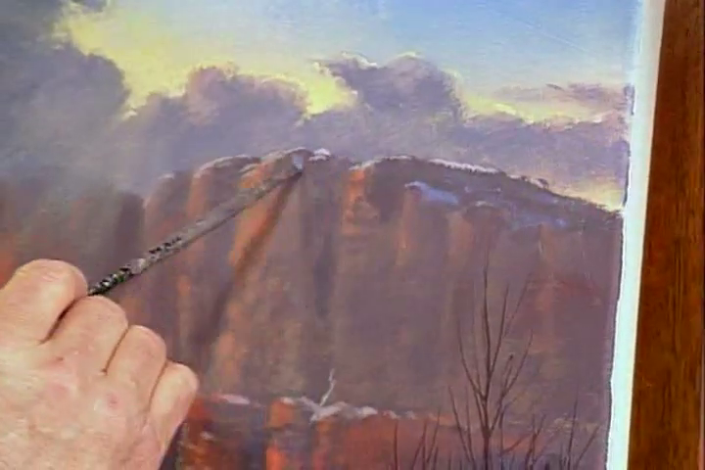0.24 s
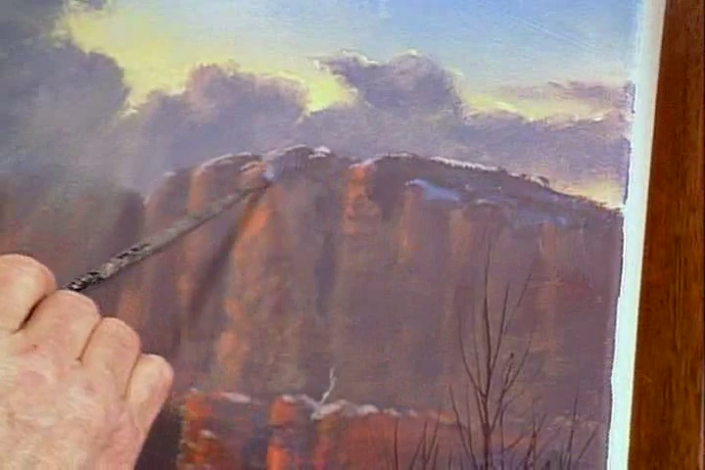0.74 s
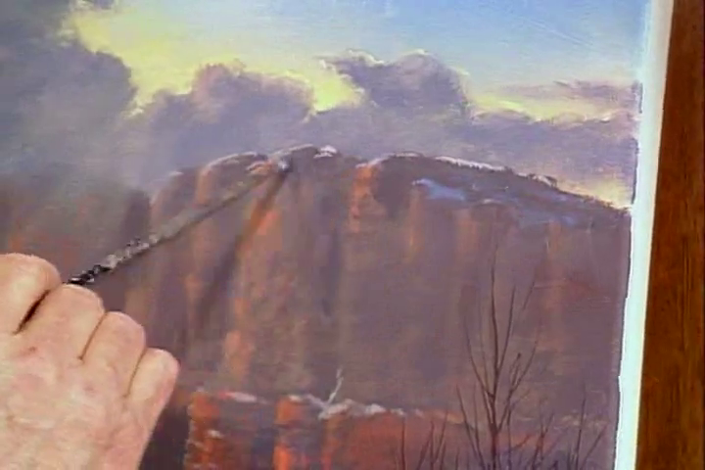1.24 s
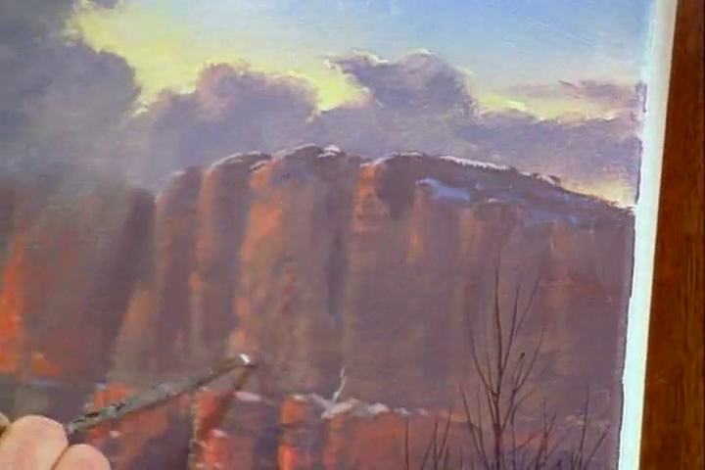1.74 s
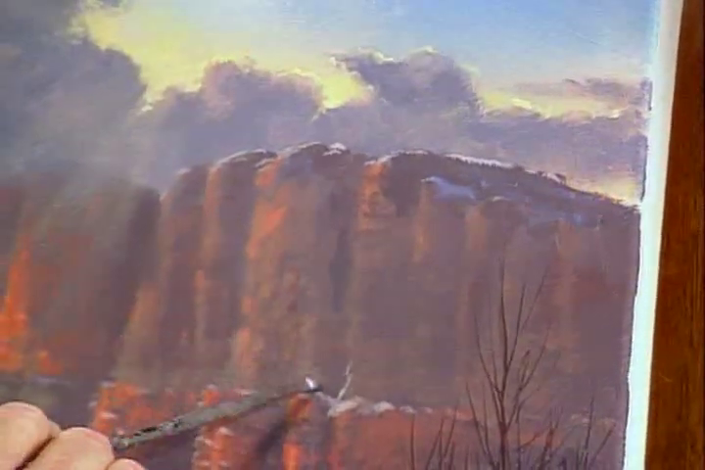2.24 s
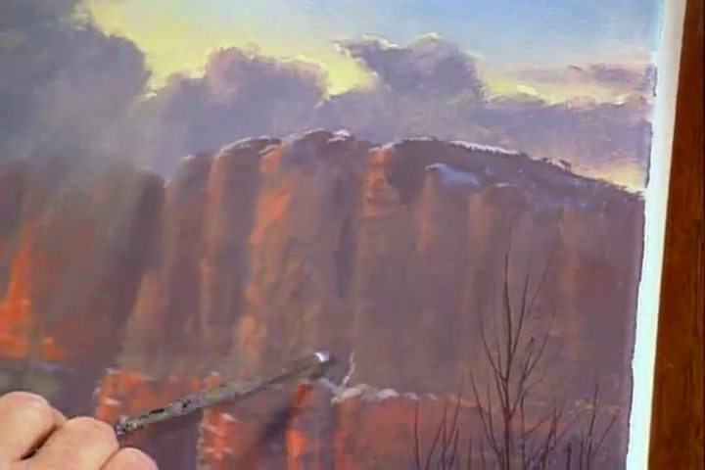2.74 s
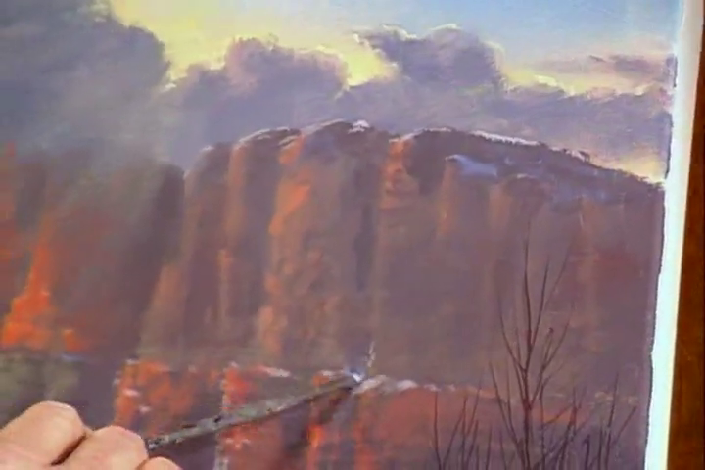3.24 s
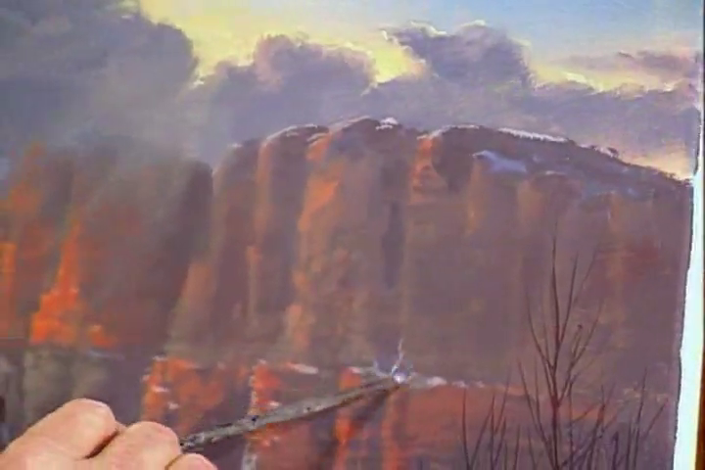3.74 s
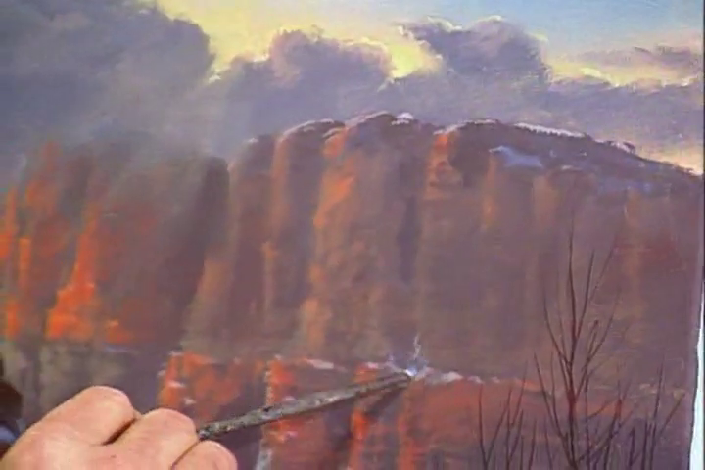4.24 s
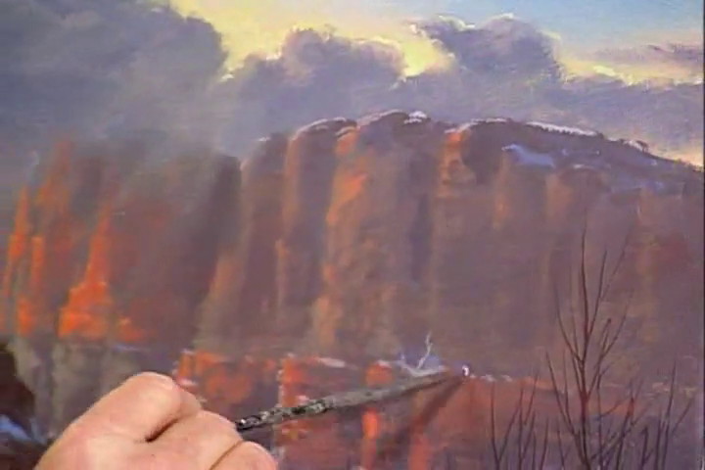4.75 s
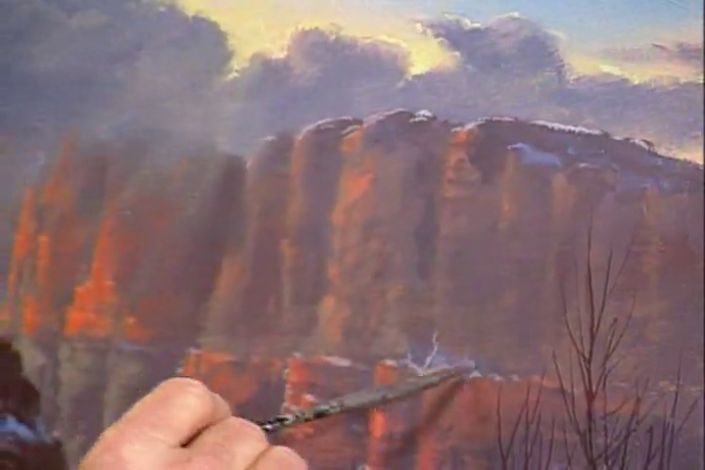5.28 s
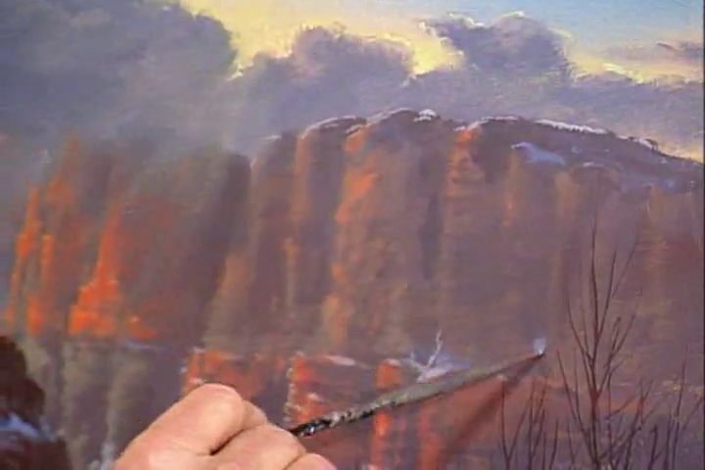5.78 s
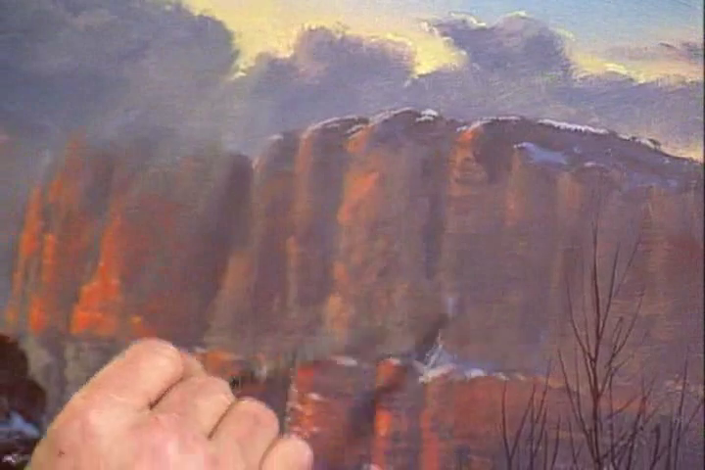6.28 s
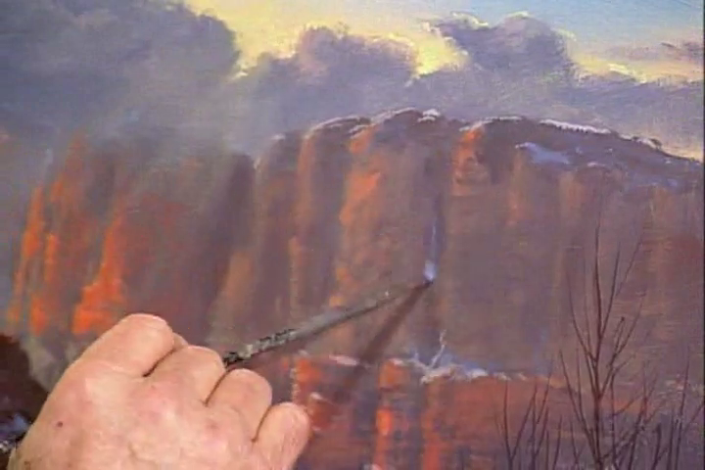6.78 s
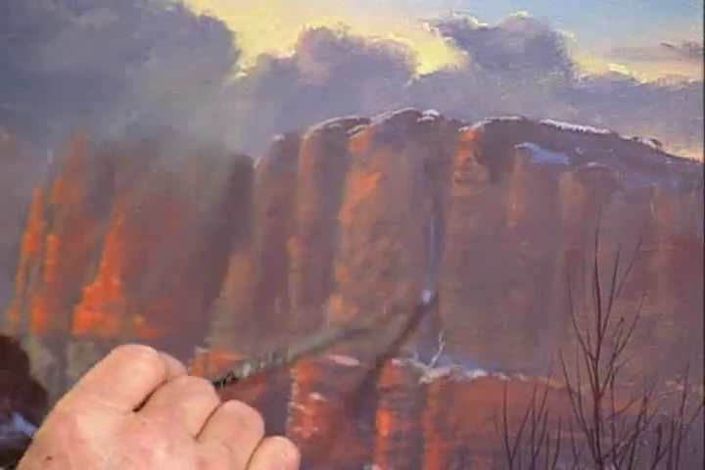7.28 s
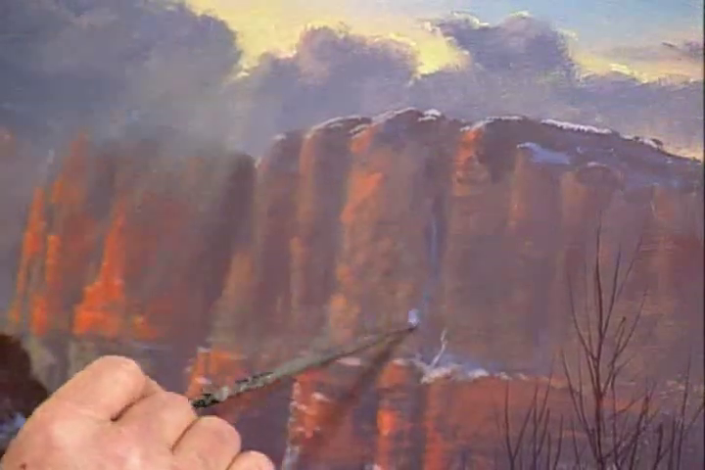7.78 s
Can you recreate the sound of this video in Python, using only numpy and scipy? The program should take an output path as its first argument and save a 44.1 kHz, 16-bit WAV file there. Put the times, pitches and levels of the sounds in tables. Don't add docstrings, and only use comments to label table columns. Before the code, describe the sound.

Steady low mains hum, room rumble and light hiss lie under close painting sounds. Quick back-and-forth bristle scratches come first, about ten a second, then nearly stop. Single dabs return, growing more frequent, with dull little taps on the taut cloth, which resonates hollowly. A crisp tick and a woody knock come near the end, followed by soft longer strokes. Small indoor room, little echo.

```python
import sys
import numpy as np
from scipy import signal
from scipy.fft import rfft, irfft, next_fast_len
from scipy.io import wavfile
from scipy.ndimage import uniform_filter1d, map_coordinates

SR = 44100
rng = np.random.default_rng(int(sys.argv[2]) if len(sys.argv) > 2 else 0)


def pcm_store(signal):
    levels = np.round(np.clip(np.atleast_2d(signal), -1, 1) * 32767)
    wavfile.write(sys.argv[1], SR, levels.astype(np.int16).T)


def convert_level_to_amplitude(level_db):
    exponent = np.asarray(level_db, float) / 20
    return 10 ** exponent


N = 353682
TIME = np.arange(N) / SR


def unit(x):
    return x / np.sqrt(np.mean(x ** 2) + 1e-20)


def along(points, hz):
    f, v = np.transpose(points)
    return np.interp(np.log(hz + 1), np.log(f + 1), v)


def curves(rows):
    s, *columns = np.transpose(rows)
    return [np.interp(TIME, s, column) for column in columns]


def wobble(rate):
    coarse = TIME[::16]
    knots = rng.standard_normal(N // 50)
    return np.interp(TIME, coarse, map_coordinates(knots, [coarse * rate]))


def filtered(x, response):
    m = next_fast_len(N + SR // 2)
    return irfft(rfft(x, m) * response(np.fft.rfftfreq(m, 1 / SR)), m)[:N]


def coloured(x, spectrum):
    return unit(filtered(x, lambda hz: convert_level_to_amplitude(along(spectrum, hz))))


def modes(table):
    def response(f):
        total = 0
        for k, (centre, width, db) in enumerate(table):
            damping = 1j * f * width
            total = total + (-1) ** k * convert_level_to_amplitude(db) * damping / (centre * centre - f * f + damping)
        return total
    return response


def tone(hz, unsteady_db):
    phase = rng.random()
    return np.sqrt(2) * convert_level_to_amplitude(unsteady_db * wobble(6)) * np.sin(2 * np.pi * (hz * TIME + phase))


def pings(rows, attack):
    out, t = np.zeros(N + SR), TIME[:SR // 5]
    for s, db, hz, t60 in rows:
        decay = convert_level_to_amplitude(db - 60 * t / max(t60, .001))
        ring = decay * (1 - np.exp(-t / attack)) * np.sin(2 * np.pi * hz * t)
        out[round(s * SR):][:len(t)] += ring
    return out[:N]


def floor():
    # (frequency [Hz], density [dB per Hz])
    rumble_spectrum = [(18, -23.5), (32, -7), (90, -6.5), (135, -5), (250, -12), (500, -25.5),
                       (1000, -35.5), (2200, -50.5)]
    # (frequency [Hz], density [dB per Hz])
    hiss_spectrum = [(500, -13), (1200, 1), (2500, -1), (6000, -1), (10000, -1.5), (11000, -2.5),
                     (11950, -4), (12100, -32)]
    # (frequency [Hz], density [dB per Hz])
    ceiling_spectrum = [(11900, -30), (12100, 0), (13200, -5), (14800, -8), (14950, 3), (15080, -30)]
    rumble = convert_level_to_amplitude(-58.5 + .7 * wobble(3.28)) * coloured(rng.standard_normal(N), rumble_spectrum)
    ceiling = convert_level_to_amplitude(-97) * coloured(rng.standard_normal(N), ceiling_spectrum)
    hiss = convert_level_to_amplitude(-72 + 0.39 * wobble(5.7)) * coloured(rng.standard_normal(N), hiss_spectrum)
    return rumble + ceiling + hiss


def hum():
    # (time [s], level [dB])
    first_order = [(0.3, -43.5), (0.67, -43.5), (7.29, -45), (7.7, -44.5)]
    # (time [s], level [dB])
    transformer_load = [(0, -66), (.2, -59), (1.05, -64), (1.99, -58), (3.88, -62), (4.2, -60.5),
                        (4.8, -67), (5.1, -62), (6, -59.5), (7.1, -58), (8.02, -57)]
    # (order [1], level [dB rms])
    buzz = [(4, -74.5), (6, -80), (7, -71), (9, -76), (10, -79), (11, -86.5), (14, -84)]
    # (frequency [Hz], level [dB rms])
    motor = [
        (30.08, -57),
        (497, -78),
    ]
    # (order [1], level [dB rms])
    whine = [(1, -79.5), (2, -86.5), (3, -86), (4, -88), (5, -87), (6, -87), (8, -82), (9, -94), (10, -97)]
    mains_hz, whine_hz = 60.01, 1500.0

    third, = curves(transformer_load)
    fifth = third.mean() - 6 + 0.24 * (third - third.mean())
    x = convert_level_to_amplitude(curves(first_order)[0]) * tone(mains_hz, unsteady_db=-0.9)

    start_s, end_s, ease_s = 1.4, 4.05, .3
    settled = np.clip(np.minimum(TIME - start_s, end_s - TIME) / ease_s, 0, 1)
    panel = unit(filtered(rng.standard_normal(N), modes([(120.7, 14, 0)])))
    second = 0.9 * tone(2 * mains_hz, unsteady_db=1.0) + 0.67 * panel
    x += convert_level_to_amplitude(-62 - 5 * settled) * second

    x += convert_level_to_amplitude(third - .8) * tone(3 * mains_hz, unsteady_db=1.1)
    x += convert_level_to_amplitude(fifth - .8) * tone(5 * mains_hz, unsteady_db=1.1)
    x += sum(convert_level_to_amplitude(db) * tone(int(k + .5) * mains_hz, unsteady_db=0.5) for k, db in buzz)
    x += sum(convert_level_to_amplitude(db) * tone(hz, unsteady_db=-1.0) for hz, db in motor)
    x += sum(convert_level_to_amplitude(db) * tone(int(k + .5) * whine_hz, unsteady_db=.3) for k, db in whine)
    return x


def taps():
    # (time [s], peak level [dB], pitch [Hz], t60 [s])
    cloth_taps = [(.099, -54, 500, 0.012), (.199, -48, 544, .016), (0.313, -49, 471, 0.014),
                  (0.373, -45, 439, 0.016), (2.978, -52, 448, 0.018), (3.368, -47.5, 503, 0.021),
                  (3.614, -47, 409, 0.015), (3.802, -49, 497, 0.016), (4.385, -43.5, 535, 0.017),
                  (4.44, -44, 428, 0.014), (4.709, -45, 520, 0.013), (4.735, -45, 500, .016),
                  (4.795, -46, 520, 0.017), (4.812, -46, 560, .016), (5.037, -46, 600, 0.013),
                  (5.341, -48, 487, 0.015), (5.795, -50, 420, 0.011), (6.021, -42, 536, 0.014),
                  (6.196, -45.5, 544, 0.015), (6.367, -49, 522, 0.014), (6.588, -44, 467, 0.016),
                  (6.786, -43, 523, .016), (6.946, -45, 417, 0.014), (7.019, -45.5, 536, 0.016),
                  (7.497, -39.5, 520, 0.011)]
    # (time [s], peak level [dB], pitch [Hz], t60 [s])
    frame_knocks = [
        (6.318, -28.5, 190, 0.031),
        (.512, -43, 845, 0.05),
        (3.9, -47, 510, 0.04),
        (5.9, -53, 650, .03),
    ]
    # (time [s], peak level [dB], pitch [Hz], t60 [s])
    paint_snaps = [
        (6.0246, -22.5, 7700, .003),
        (6.0246, -30, 6100, .003),
        (6.0267, -32, 10500, .0025),
        (6.59, -42, 4500, .003),
        (6.794, -35, 7200, .003),
        (7.498, -46, 6000, .003),
    ]
    knocks = convert_level_to_amplitude(3.5) * pings(cloth_taps, attack=0.00084) + pings(frame_knocks, attack=0.0026)
    return knocks + pings(paint_snaps, attack=.002)


def slips(fine_db, clump_db):
    return rng.standard_normal(N) * convert_level_to_amplitude(fine_db * wobble(600) + clump_db * wobble(70))


def angled(x, depth_db):
    z = signal.stft(x, nperseg=512)[2]
    field = uniform_filter1d(rng.standard_normal(z.shape), size=7, axis=0)
    field = uniform_filter1d(field, size=22, axis=1)
    return signal.istft(z * convert_level_to_amplitude(depth_db * unit(field)), nperseg=512)[1][:N]


def pressure():
    # (full speed at [s], hold [s], bristle hiss [dB],
    # weight on the cloth [dB], bite into the weave [dB])
    scrub = [(.14, 0.081, -72, 11, -0.5), (0.33, .002, -76, 8, -5), (0.411, 0.014, -67, 12, -1.5),
             (0.519, 0.0039, -59.5, 11.5, -3.5), (0.617, 0.013, -67, 14.5, -2.5),
             (0.725, 0.012, -70.5, 11, -4), (0.823, 0.0093, -68.5, 15.5, -1),
             (0.911, 0.019, -62.5, 8, -2.5), (1.033, 0.024, -69.5, 17, 2), (1.139, .008, -63.5, 13, -1.5),
             (1.2, 0.035, -77.5, 8, -1), (1.422, 0.027, -80, 20, 4)]
    # (full speed at [s], hold [s], bristle hiss [dB],
    # weight on the cloth [dB], bite into the weave [dB])
    strokes = [(2.596, .02, -78, 18, 5.5), (2.997, .006, -77, 16, 4.5), (3.03, .03, -91, 22, 6),
               (3.264, .008, -77, 12, 6), (3.29, .03, -87.5, 24, 3), (3.813, 0.055, -78, 20, 3.5),
               (4.12, .03, -81.5, 14, 4.5), (4.218, .09, -78.5, 17.5, 0), (4.572, .025, -78, 17, -1),
               (4.716, 0.014, -67.5, 18, 3.5), (4.798, 0.012, -83.5, 23, 7.5), (5.052, 0.077, -71, 15, 1),
               (5.404, 0.073, -67, 11.5, 1.5), (5.858, .05, -74, 12, 3), (6.022, .004, -74.5, 16, -2),
               (6.28, 0.023, -77, 19, 2.5), (6.593, 0.073, -87.5, 20, 3), (6.72, .04, -76.5, 17, -3),
               (6.785, .09, -70, 13.5, -2), (7.072, 0.038, -69.5, 12, -4.5), (7.13, .05, -69.5, 15.5, -2.5),
               (7.5, .003, -78.5, 22, -6), (7.558, 0.077, -73.5, 12.5, -1.5), (7.83, .04, -77.5, 17, -1.5)]
    rise_db_per_s, fall_db_per_s, sag_db_per_s = 602, 520, 29
    cloth_slower = 0.89
    tight_share = 0.48

    gains = np.zeros((4, N))
    for s, hold, db, weight_db, bite_db in [*scrub, *strokes]:
        part = slice(max(round((s - .12) * SR), 0), round((s + hold + .12) * SR))
        t = TIME[part]
        rise_db = -rise_db_per_s * np.clip(s - t, 0, 1)
        fall_db = -fall_db_per_s * np.clip(t - s - hold, 0, 1)
        sag_db = -sag_db_per_s * np.clip(t - s - hold / 2, -hold / 2, hold / 2)
        speed_db = (rise_db + fall_db) * [[1], [1], [cloth_slower], [cloth_slower]] + sag_db
        tight_db = tight_share * weight_db + (1 - tight_share) * bite_db
        gains[:, part] += convert_level_to_amplitude(db + speed_db + np.array([[0], [bite_db], [weight_db], [tight_db]]))
    return gains


def brush():
    # (centre [Hz], width [Hz], level [dB])
    drum_modes = [
        (298, 158, -3),
        (476.6, 84, 4),
        (521, 96, 4),
        (673, 175, -3),
    ]
    # (centre [Hz], width [Hz], level [dB])
    tight_modes = [
        (817, 120, 0.5),
        (1130, 330, -2),
        (1284, 540, -6),
    ]
    # (time [s], level [dB])
    drag = [(0.0, -61.5), (0.8, -63.5), (1.27, -62), (1.81, -72.5), (3.24, -66), (3.6, -73), (4.27, -60),
            (5.41, -66.5), (6.1, -63), (6.97, -67.5), (7.35, -68.5), (8.02, -66)]
    # (frequency [Hz], density [dB per Hz])
    weave_spectrum = [(900, -25), (1300, 5), (2300, 3), (3350, 2.5), (4000, -1), (4600, 5), (5300, -5),
                      (7000, -37)]
    # (frequency [Hz], density [dB per Hz])
    bristle_spectrum = [(4500, -29), (6000, -3), (8300, -3), (9900, 1), (11800, -0.5), (12150, -40)]

    hiss, scratch, drum, tight = pressure()
    push = slips(fine_db=2.5, clump_db=1.1)
    skin = convert_level_to_amplitude(-2.5) * drum * unit(filtered(push, modes(drum_modes)))
    skin += tight * unit(filtered(push, modes(tight_modes)))

    rub = slips(fine_db=3.0, clump_db=2.5)
    rubbed = unit(filtered(rub, modes(drum_modes)) + 0.63 * filtered(rub, modes(tight_modes)))
    slide = convert_level_to_amplitude(curves(drag)[0] - 5.0) * rubbed

    tips = angled(slips(fine_db=1.8, clump_db=.7), depth_db=2.1)
    hard = np.clip((20 * np.log10(hiss + 1e-9) + 68) / 3, 0, 1)
    top = convert_level_to_amplitude(-5.5) * hard * coloured(tips, [(11700, -54), (12000, 25), (12800, 0), (13050, -44)])
    weave = convert_level_to_amplitude(1.5) * scratch * coloured(tips, weave_spectrum)
    bristles = convert_level_to_amplitude(3.0) * hiss * (coloured(tips, bristle_spectrum) + top)
    return skin + slide + weave + bristles


def room(x):
    # (frequency [Hz], t60 [s])
    decay_times = [
        (200, 0.38),
        (2000, 0.17),
        (10000, 0.065),
    ]
    hz, t, z = signal.stft(rng.standard_normal(SR // 2), SR, nperseg=256)
    decay = convert_level_to_amplitude(-60 * t / along(decay_times, hz)[:, None])
    tail = signal.istft(z * decay, SR, nperseg=256)[1]
    delayed = np.pad(x, (300, 0))
    return signal.fftconvolve(delayed, tail / np.linalg.norm(tail))[:N]


def scene():
    easel = brush() + taps()
    return (easel + convert_level_to_amplitude(-14.0) * room(easel) + hum() + floor())[None]


def treble_gate(x):
    hz, _, z = signal.stft(x, SR, nperseg=1024)

    def band(low, high):
        return (hz > low) & (hz < high)

    def over(value, db):
        return np.clip((value - db) / 1.2, 0, 1)

    frames = z.shape[1]
    luck = np.repeat(rng.standard_normal((frames, 2)), 2, axis=0)[:frames].T
    patches = uniform_filter1d(rng.standard_normal(z.shape), size=6, axis=0)
    patches = unit(uniform_filter1d(patches, size=2, axis=1))
    treble = 10 * np.log10(np.sum(abs(z[band(1600, 10200)]) ** 2, axis=0) + 1e-15)
    treble = uniform_filter1d(treble - np.median(treble), size=5)
    holes = over(np.minimum(1.5 * treble, 5) + 1.5 * patches, db=3.1)

    keep = np.ones(z.shape)
    keep[band(11200, 11920)] = .33 + .67 * over(treble + 1.5 * luck[0], db=.9)
    faint = band(13050, 13420) | band(13580, 14880)
    keep[faint] = 1 - holes[faint]
    shelf = band(12250, 13050)
    keep[shelf] = np.maximum(1 - holes[shelf], over(treble, db=6))
    keep[band(14880, 15200)] = luck[1] > 0
    return signal.istft(z * keep, SR, nperseg=1024)[1][:N]


def band_limit(x):
    return signal.sosfilt(signal.butter(12, 15050, fs=SR, output="sos"), x)


def record(dry):
    def notch(hz):
        return 1 - .9 * np.exp(-((hz - 10450) / 210) ** 4)

    mix = treble_gate(filtered(dry[0], notch))[None]
    return band_limit(mix)


dry = scene()
out = record(dry)
pcm_store(out)
```